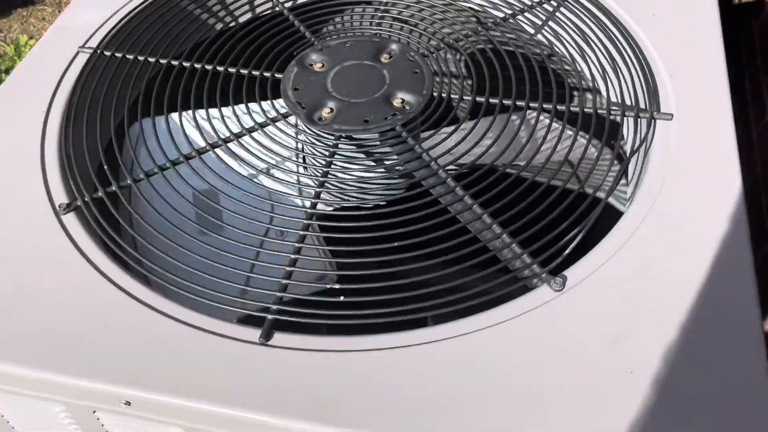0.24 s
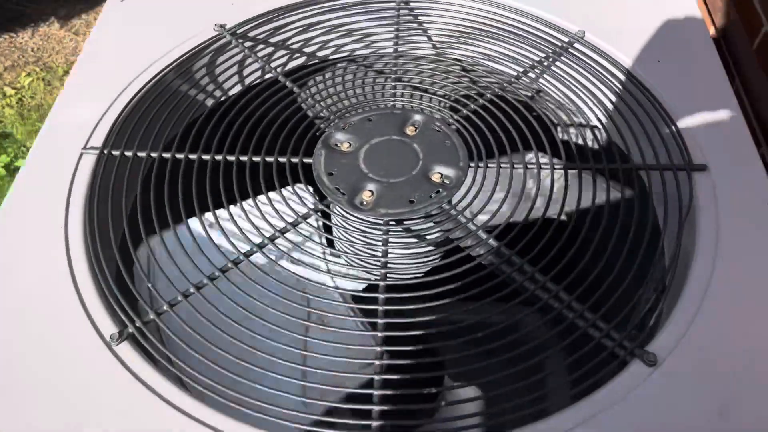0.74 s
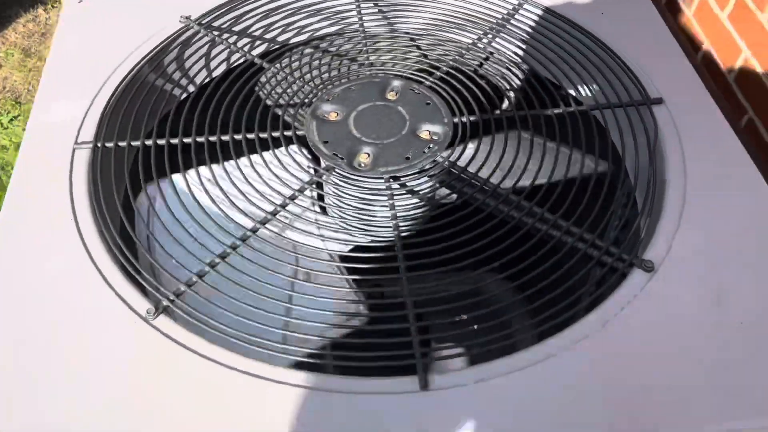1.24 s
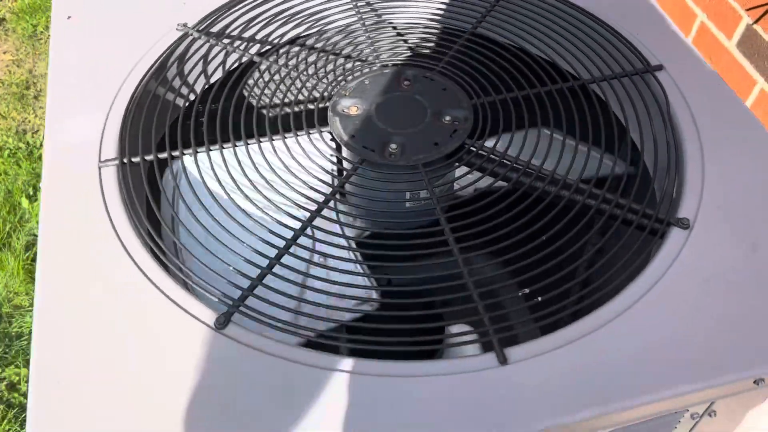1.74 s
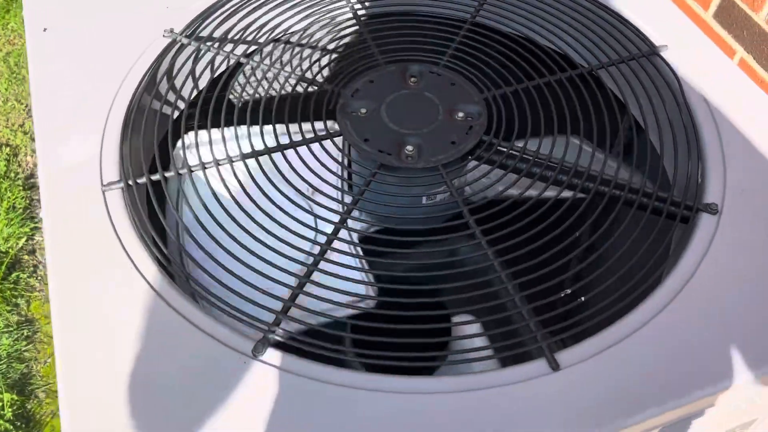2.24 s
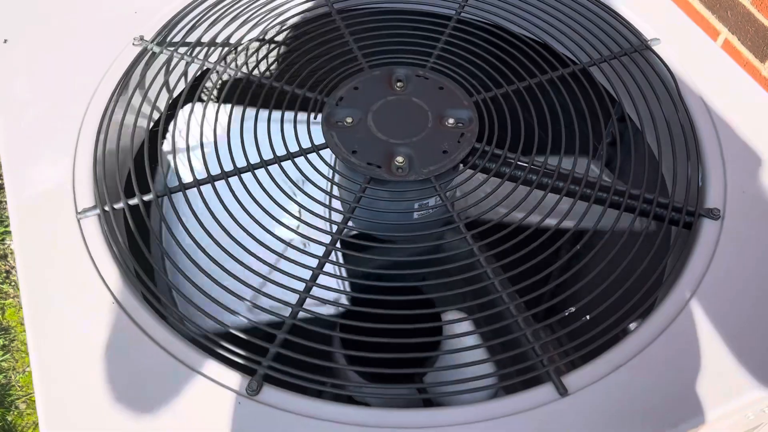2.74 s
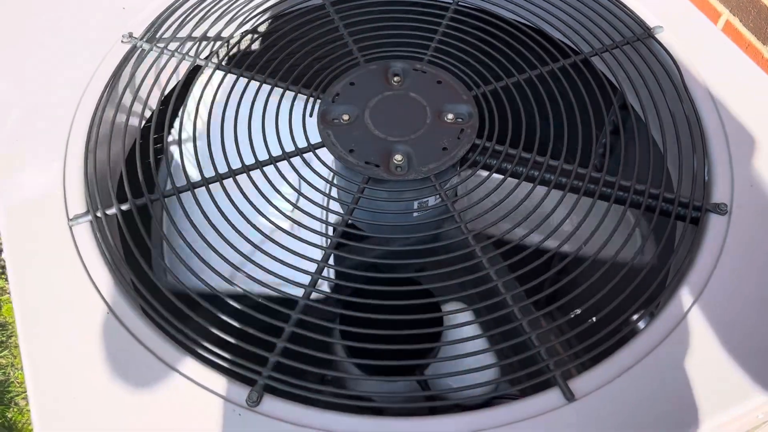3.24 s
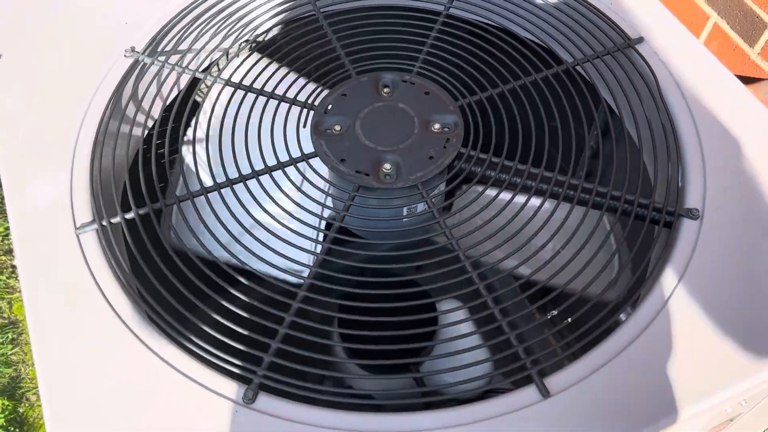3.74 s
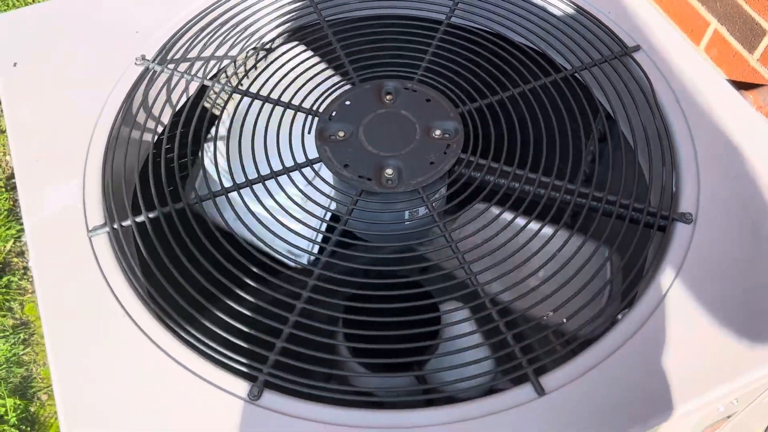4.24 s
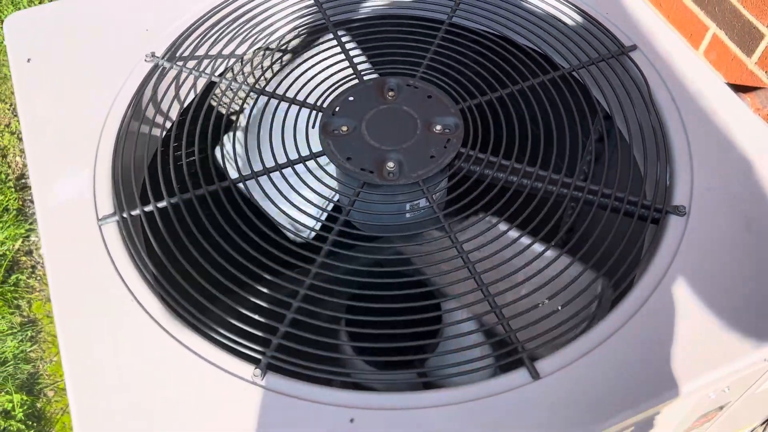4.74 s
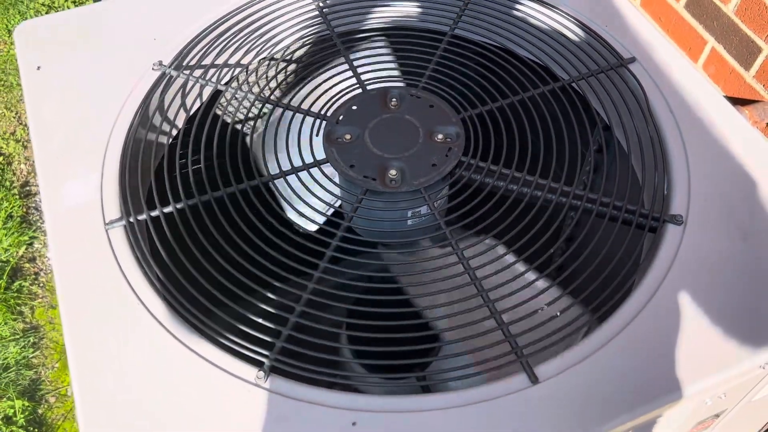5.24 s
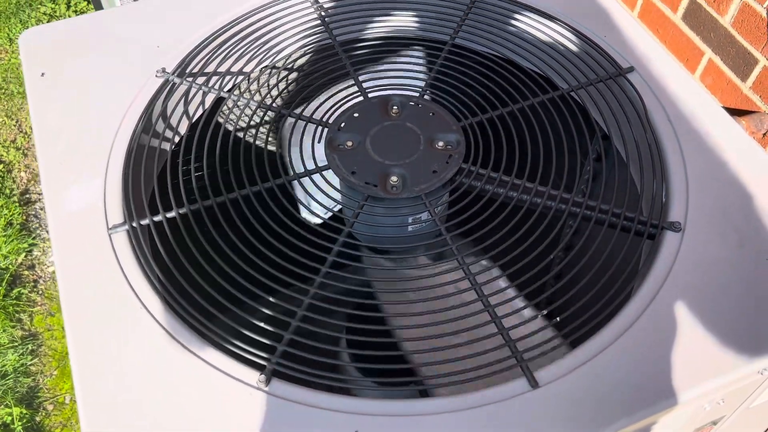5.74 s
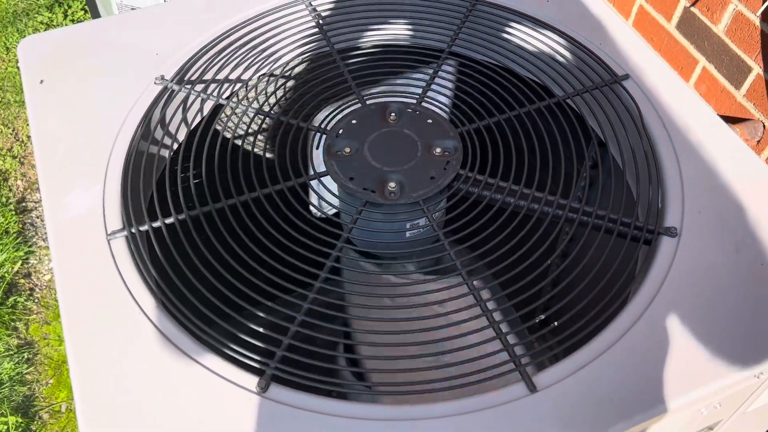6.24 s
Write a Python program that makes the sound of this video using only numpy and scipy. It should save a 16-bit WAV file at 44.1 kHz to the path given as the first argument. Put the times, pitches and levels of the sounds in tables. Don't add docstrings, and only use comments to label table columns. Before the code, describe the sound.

From 0 to 0.4 seconds an outdoor air-conditioning unit is heard fairly cleanly, close to its casing: low drone, steady hum, a buzzy compressor whine around one to one and a half kilohertz, and bright hiss fluttering rapidly with the fan blades. At about 0.4 the microphone enters the fan stream and a hard, low wind thump lands. Gusts then follow irregularly, several each second, mixing deep heaves, fluttering swarms and short slaps with a slight falling chirp. Strong hits come near 0.9, 1.3, 1.8 to 2.1, 2.3, 3.6, 3.8, 4.6, 4.9, 5.6, 5.9 and 6.4, with sharp snaps near 2.3, 3.6, 3.8 and 4.9. Between blasts the whine and hiss show through, the whine shifting in tone while hum and drone weaken. Hits lean left, nearly overloading. The machine and buffeting continue to the end at 6.5 seconds.

```python
import sys
import numpy as np
from scipy import signal
from scipy.fft import rfft, irfft, next_fast_len
from scipy.io import wavfile
from scipy.ndimage import uniform_filter1d, map_coordinates

SR = 44100
rng = np.random.default_rng(int(sys.argv[2]) if len(sys.argv) > 2 else 0)


def rack_gain(trim_db):
    fader = np.asarray(trim_db, float)
    return 10 ** (fader / 20)


def output_pcm(signal):
    pcm = np.clip(np.atleast_2d(signal).T, -1, 1) * 32767
    wavfile.write(sys.argv[1], SR, np.round(pcm).astype(np.int16))


N = 286209
TIME = np.arange(N) / SR
SHAFT_HZ, BLADE_HZ = 59.25, 27.9

# t/s, place [0 beside the casing - 1 over the fan]
TRAVEL = [
    (0, 0.01),
    (.4, 0.11),
    (1.0, 0.18),
    (1.8, 0.49),
    (2.6, 0.44),
    (3.15, 0.52),
    (3.5, 0.54),
    (5.2, 0.77),
    (6.49, 0.98),
]


def unit(x):
    return x / np.sqrt(np.mean(x ** 2) + 1e-20)


def along(points, hz):
    f, v = np.transpose(points)
    return np.interp(np.log(hz + 1), np.log(f + 1), v)


def wobble(rate):
    knots = rng.standard_normal(int(N * rate / SR) + 4)
    return map_coordinates(knots, [TIME * rate])


def filtered(x, response):
    m = next_fast_len(N + SR // 4)
    return irfft(rfft(x, m) * response(np.fft.rfftfreq(m, 1 / SR)), m)[..., :N]


def lobe(place, centre, width, peak_db, else_db):
    return else_db + (peak_db - else_db) * np.exp(-.5 * ((place - centre) / width) ** 2)


def ports(hz):
    # f/Hz, left minus right level/dB
    tilt = [(200, 0), (600, 0), (900, 2), (1400, -11), (1600, -5.5), (1720, 10), (1950, -1), (3500, 3),
            (5500, 2.5), (7000, 0.5)]
    # f/Hz, phase by which the left port leads/rad
    lead = [(400, 0), (1350, -.8), (1620, -2.3), (1800, 0), (3100, 1), (4800, 0), (5900, -.8), (6600, -.1),
            (7600, -.35), (9100, -2.85), (10500, -3.45), (12000, -6), (13800, -6.65), (14700, -9.1)]
    half = rack_gain(along(tilt, hz) / 2) * np.exp(.5j * along(lead, hz))
    return np.array([half, 1 / half])


def rush(spectrum, patchy_db):
    # f/Hz, left-right likeness [0-1]
    alike = [(60, .93), (400, .8), (900, .6), (1400, .55), (2400, .85), (4500, .72), (5800, .75),
             (6600, .96), (7500, .96), (8300, .85), (9200, .97), (10400, .97), (11300, .85), (12200, .98)]
    z = signal.stft(rng.standard_normal((2, N + 512)), nperseg=512)[2]
    field = uniform_filter1d(rng.standard_normal(z.shape[1:]), size=5, axis=0)
    field = uniform_filter1d(field, size=8, axis=1)
    pair = signal.istft(z * rack_gain(patchy_db * unit(field)), nperseg=512)[1][:, :N]
    m = next_fast_len(N)
    hz = np.fft.rfftfreq(m, 1 / SR)
    angle = np.arccos(np.clip(along(alike, hz), -1, 1)) / 2
    shares = np.array([[np.cos(angle), way * np.sin(angle)] for way in (1, -1)])
    mix = ports(hz)[:, None] * rack_gain(along(spectrum, hz)) * shares
    return unit(irfft((mix * rfft(pair, m)).sum(axis=1), m)[:, :N])


def puffs(s, size, width_ms, pan_db, spin):
    reach = 300
    grid = np.arange(-reach, reach + 1)
    at = np.round(s * SR).astype(int)[:, None] + grid + reach
    u = grid / (np.clip(width_ms, .05, 2.2)[:, None] * SR / 1000)
    start_phase = 2 * np.pi * rng.random((len(s), 1)) * (spin > 0)
    swing = np.cos(spin * u + start_phase)
    bell = size[:, None] * np.exp(-.5 * u ** 2) * swing * np.hanning(len(grid))
    sides = []
    for way in (1, -1):
        push = bell * rack_gain(way * pan_db / 2)[:, None]
        summed = np.bincount(at.ravel(), push.ravel(), N + 2 * reach + 1)
        sides.append(summed[reach:N + reach])
    return np.array(sides)


def gusts(t):
    # start t/s, hold/s, eddy level/dB, slow heave level/dB
    blasts = [(0.407, 0.067, -23, -24), (0.576, 0.15, -20.5, -15.5), (0.765, .1, -20.5, -19.5),
              (0.906, 0.087, -18, -25.5), (1.04, 0.093, -20.5, -17), (1.19, 0.039, -17, -25),
              (1.28, 0.13, -15, -17), (1.49, 0.033, -20.5, -27), (1.701, .14, -17.5, -18),
              (1.899, 0.27, -14, -24), (2.261, 0.13, -15, -24.5), (2.519, 0.25, -18.5, -24),
              (2.911, 0.055, -17, -25), (3.105, 0.11, -23, -25), (3.276, 0.27, -19.5, -25),
              (3.532, 0.11, -15.5, -28), (3.79, 0.032, -17.5, -15), (3.935, .26, -18.5, -19),
              (4.324, 0.081, -19.5, -18), (4.468, 0.062, -16.5, -16), (4.598, 0.094, -19, -18.5),
              (4.865, 0.094, -18, -18.5), (5.097, 0.048, -22, -23), (5.252, 0.19, -22, -21),
              (5.536, 0.069, -18, -17), (5.682, 0.22, -20, -19), (5.887, 0.064, -15, -24),
              (6.0, 0.185, -18, -17.5), (6.288, 0.048, -14, -27), (6.383, 0.14, -20.5, -21)]
    rise_db_per_s, fall_db_per_s = 407, 247
    lulls_db = -26, -28.5
    enter_s, shelter_db = .37, 13
    start, hold, *peaks_db = np.transpose(blasts)[..., None]
    start = start - .011
    early_db = rise_db_per_s * np.clip(start - t, 0, None)
    late_db = fall_db_per_s * np.clip(t - start - hold, 0, None)
    loss_db = early_db + late_db
    calm_db = shelter_db * np.clip((enter_s - t) / .04, 0, 1)
    return [np.maximum((peak - loss_db).max(axis=0), lull - calm_db)
            for peak, lull in zip(peaks_db, lulls_db)]


def port_pan_db(count):
    return 4 + 5.5 * rng.standard_normal(count)


def wind():
    # f/Hz, spectral density level/dB
    heave_spectrum = [(20, -33), (35, -17), (50, 7.5), (75, 10), (120, 3), (200, -4), (400, -37),
                      (2000, -120)]
    # t/s, peak level/dB, width/ms
    slap_events = [(0.408, 3.5, 0.88), (.427, -3.5, 1.15), (0.788, 3, 0.95), (0.815, 2, 1.07),
                   (0.912, 2, 0.53), (.935, 4, 2.5), (1.313, 1, 0.29), (1.362, 6, .89), (1.791, 3.5, 0.5),
                   (1.887, 3.5, 0.39), (1.912, 2, 0.44), (2.041, 2, 0.31), (2.066, 0.5, 0.42),
                   (2.131, -3, 0.3), (2.288, 3.5, 0.32), (2.721, 0, 0.52), (3.323, -1.5, 0.48),
                   (3.401, -2, 0.35), (3.549, 0, .42), (3.588, 4, .36), (3.796, 5.5, .34), (4.177, 0, .29),
                   (4.639, 4.5, 0.67), (4.887, 4.5, 0.31), (5.13, 0, 0.83), (5.574, 1.5, 0.63),
                   (5.872, -1.5, 1.3), (5.918, 2.5, 0.66), (6.148, 0.5, 1), (6.393, 2.5, 0.35)]
    # t/s, peak level/dB, f/Hz
    flick_events = [(.394, -3.5, 380), (.906, -5, 483), (1.204, -11, 552), (1.311, -15, 420),
                    (1.786, 1.5, 500), (1.953, -4, 626), (1.995, -6.5, 560), (2.041, -4.5, 456),
                    (2.11, -9, 525), (2.269, -10, 493), (3.017, -10.5, 589), (3.144, -8, 410),
                    (3.301, -4.5, 423), (3.4, -11, 430), (3.577, -1, 480), (3.794, -12, 428),
                    (3.924, -3.5, 454), (3.984, -4, 407), (4.08, -7, 500), (4.176, -9, 405),
                    (4.637, -2, 510), (4.885, -1, 523), (5.116, -7, 437), (5.273, -4, 510),
                    (5.296, -6, 610), (5.541, -10, 398), (5.874, -3.5, 545), (6.021, -9, 520),
                    (6.145, -4, 510), (6.388, -8, 547)]
    # t/s, peak level/dB, f/Hz
    crack_events = [
        (1.8834, -33, 1700),
        (2.287, -19, 1880),
        (3.5816, -15.5, 1750),
        (3.5822, -22, 2500),
        (3.7944, -23, 1750),
        (4.8851, -21, 1750),
    ]
    heave_db = gusts(TIME + .017)[1] - 2
    heave = rack_gain(heave_db) * unit(rack_gain(2.2 * wobble(22)) * rush(heave_spectrum, patchy_db=5))

    draw, luck = rng.standard_normal((3000, 3)), rng.random((3000, 2))
    s = luck[:, 0] * (N - 1) / SR
    force_db = gusts(s)[0] + 3.1 * wobble(45)[(s * SR).astype(int)]
    width_ms = 1.24 * rack_gain(-.15 * (force_db + 34.5) + 3.13 * np.clip(draw[:, 0], -1.5, 2))
    size = rack_gain(force_db - 2 - 2.15 * np.log(luck[:, 1] + .03))
    swarm = puffs(s, size, width_ms, 6.5 * draw[:, 2], spin=1.55)

    s, slap_db, width_ms = np.transpose(slap_events)
    sign = np.sign(rng.standard_normal(len(s)))
    slaps = puffs(s, sign * rack_gain(slap_db - 2), width_ms, .4 * port_pan_db(len(s)), spin=0)

    s, flick_db, hz = np.transpose(flick_events)
    width_ms = 3.27 * 1000 / (2 * np.pi * hz)
    flicks = puffs(s + .00211, rack_gain(flick_db - 4), width_ms, port_pan_db(len(s)), spin=3.11)

    s, crack_db, hz = np.transpose(crack_events)
    spin = 6
    width_ms = spin * 1000 / (2 * np.pi * hz)
    cracks = puffs(s + .00215, rack_gain(crack_db - 1), width_ms, port_pan_db(len(s)), spin)

    low_cut = lambda hz: hz ** 4 / np.sqrt(hz ** 8 + 43.0 ** 8)
    return heave + filtered(swarm + slaps + flicks + cracks, low_cut)


def compressor():
    # multiple of shaft speed, left level/dB, right level/dB
    whine = [(10, -53, -54), (11, -45, -47), (12, -56, -47), (13, -51, -49), (14, -52, -49), (15, -48, -49),
             (16, -47, -42), (17, -51, -47), (18, -48, -44), (19, -53, -48), (20, -49, -43), (21, -49, -45),
             (22, -43, -39), (23, -48, -42), (24, -48, -44), (25, -52, -51), (26, -47, -46), (27, -48, -45),
             (28, -57, -64), (29, -57, -65), (30, -63, -70), (31, -59, -64), (32, -61, -63), (33, -63, -65)]
    # f/Hz, level/dB
    upper = [(1900, -87), (2250, -71.5), (2900, -61.5), (3600, -72), (4100, -67.5), (4800, -63.5),
             (5200, -95), (5800, -63.5), (6500, -85), (7300, -100)]
    # multiple of shaft speed, level relative to the hum/dB
    hum = [(1, -14), (2, -6.5), (3, 0.5), (4, -12), (5, -10.5), (6, -13.5), (7, -23), (9, -21.5)]
    # centre place [0-1], width [place], peak level/dB, level elsewhere/dB
    beams = [(0.28, 0.17, -42.5, -45), (0.34, 0.089, -36, -58), (.3, 0.22, -40, -66),
             (0.73, 0.45, -37.5, -57), (0.46, 0.11, -39.5, -56), (0.1, 0.061, -36, -54.5)]
    lobed_orders = (16, 18, 20, 22, 23, 24)
    knot_s, table = .4, 8192
    knots = np.arange(0, N / SR + 1, knot_s)
    place = np.interp(knots, *np.transpose(TRAVEL))

    order = np.arange(table // 2 + 1) / 2
    upper_db = along(upper, order * SHAFT_HZ) + 4 * np.tanh(rng.standard_normal(len(order)))
    level = np.tile(upper_db, (2, len(knots), 1))
    level += np.array([1.5, -1.5])[:, None, None]
    level[..., (order < 34) | (order > 125) | (order % 1 > 0)] = -150
    for k, left_db, right_db in whine:
        i = round(2 * k)
        level[:, :, i] = [[left_db], [right_db]]
        level[:, :, i + 1] = [[left_db - 8], [right_db - 8]]
    level += 3.5 * rng.standard_normal(level.shape) - 2.5
    hum_db = lobe(place, centre=.01, width=.1, peak_db=-25.5, else_db=-41)
    for k, below_db in hum:
        level[:, :, round(2 * k)] = hum_db + below_db
    for k, beam in zip(lobed_orders, beams):
        level[:, :, 2 * k] = lobe(place, *beam) + np.array([[-.6], [.6]])

    shared_drift = np.cumsum(rng.standard_normal(level.shape[1:]), axis=0)
    drift = .55 * rng.standard_normal(level.shape) + .5 * shared_drift
    strong = [round(2 * k) for k in (*lobed_orders, *np.transpose(hum)[0])]
    drift[..., strong] *= .2
    phase = drift + 2 * np.pi * rng.random(len(order)) + np.angle(ports(order * SHAFT_HZ))[:, None]

    waves = irfft(rack_gain(level) * np.exp(1j * phase), table) * table / np.sqrt(2)
    waves = np.concatenate([waves, waves[..., :1]], axis=2)
    where = [TIME / knot_s, (SHAFT_HZ / 2 * TIME % 1) * table]
    return np.array([map_coordinates(w, where, order=1) for w in waves])


def airflow():
    # f/Hz, spectral density level/dB
    drone_spectrum = [(30, 13), (60, 19), (200, 2), (450, 1), (800, -1), (1300, -3), (1600, -2),
                      (1750, -13), (2100, -13.5), (2600, -32)]
    air_spectrum = [(1200, 7.5), (2000, 3.5), (3000, 4.5), (4600, 1.5), (5200, 2), (5800, 1), (6400, 1),
                    (6850, 4.5), (7500, -6.5), (8400, 1.5), (10100, -12), (10900, -5), (14200, -14.5),
                    (15000, -37)]
    plate_spectrum = [(5000, -43), (5600, -23), (5760, 6), (5900, -2), (6100, -6), (6700, -36)]
    louvre_spectrum = [(450, -38), (700, 5), (1150, 2), (1500, -26.5)]
    place = np.interp(TIME, *np.transpose(TRAVEL))

    turn = SHAFT_HZ * TIME
    valve = 1 + .9 * np.exp(-(turn % 1) / .09) + .3 * np.exp(-((turn + .45) % 1) / .06)
    blade = 2 * np.pi * BLADE_HZ * TIME + .72 * wobble(1)
    sweep = np.sin(blade) + .45 * np.sin(2 * blade) + .2 * np.sin(3 * blade)
    depth_db = 1.8 + .3 * wobble(3)

    hiss_db = lobe(place, centre=-1, width=-.04, peak_db=-48, else_db=-45)
    air = rack_gain(hiss_db + 2.3 + .3 * wobble(12)) * rush(air_spectrum, patchy_db=.7)
    ring_db = lobe(place, centre=.17, width=.05, peak_db=-46, else_db=-54)
    ring = rack_gain(ring_db - 5 + 2.2 * sweep) * rush(plate_spectrum, patchy_db=2)
    hiss = rack_gain(depth_db * sweep) * valve * (air + ring)

    panel = rack_gain(-39 - 9.5 * place) * rush(louvre_spectrum, patchy_db=4)
    drone_db = -31.5 - 2.5 * place + 7 + .29 * wobble(3.45)
    drone = rack_gain(drone_db) * rush(drone_spectrum, patchy_db=1.7)
    return hiss + panel + drone


def scene():
    return wind() + compressor() + airflow()


def top_cut(x):
    return signal.sosfilt(signal.butter(12, 15060, fs=SR, output="sos"), x)


def record(dry):
    def low_cut(hz):
        stages = np.exp(-2j * (8 * np.arctan(hz / 60) + 2 * np.arctan(hz / 300)))
        return stages * hz ** 3 / np.sqrt(hz ** 6 + 36.0 ** 6)

    late = filtered(dry, low_cut)
    soft = late / (1 + np.abs(late / .97) ** 4) ** (1 / 4)
    return top_cut(soft)


dry = scene()
out = record(dry)
output_pcm(out)
```